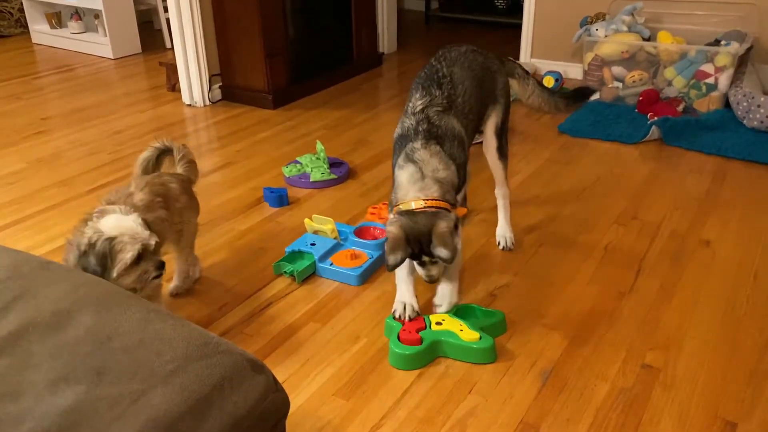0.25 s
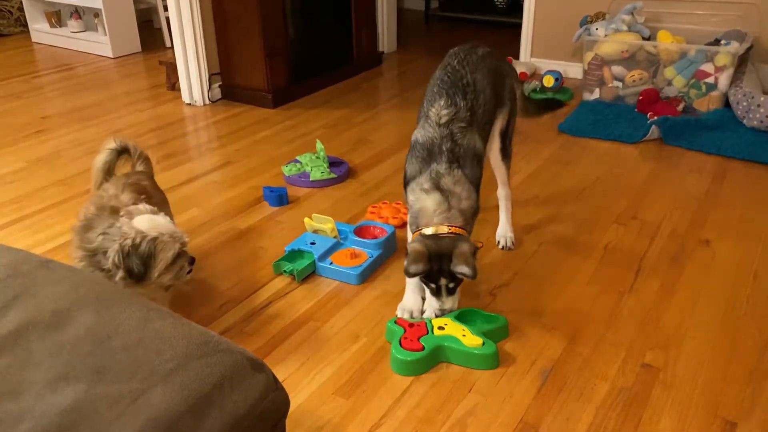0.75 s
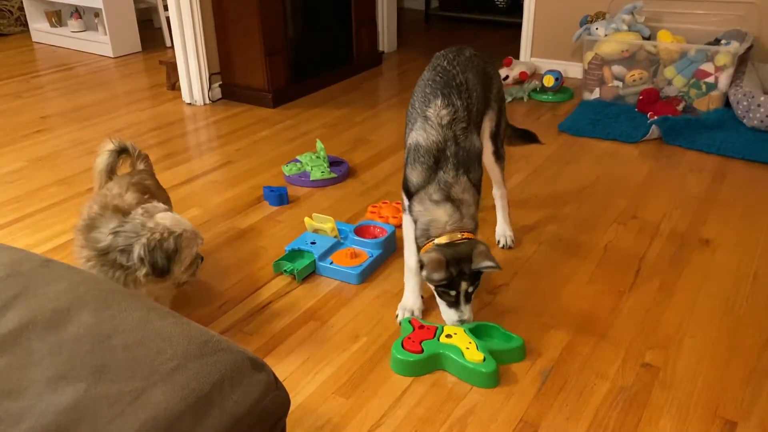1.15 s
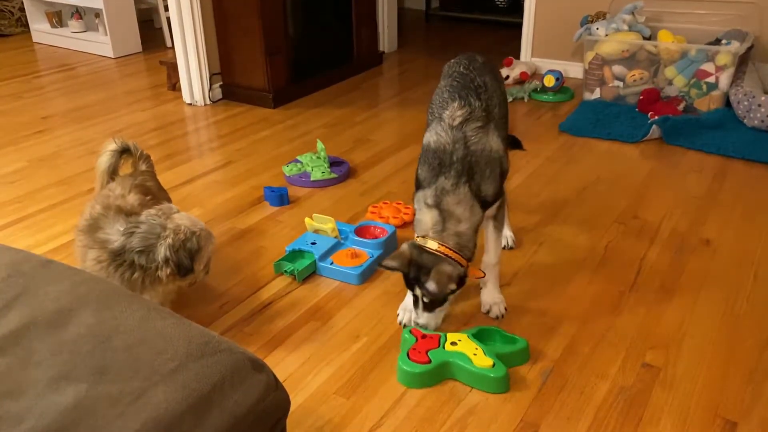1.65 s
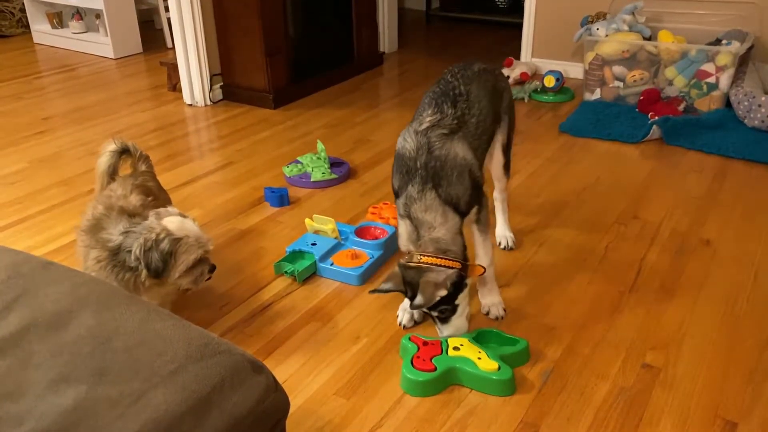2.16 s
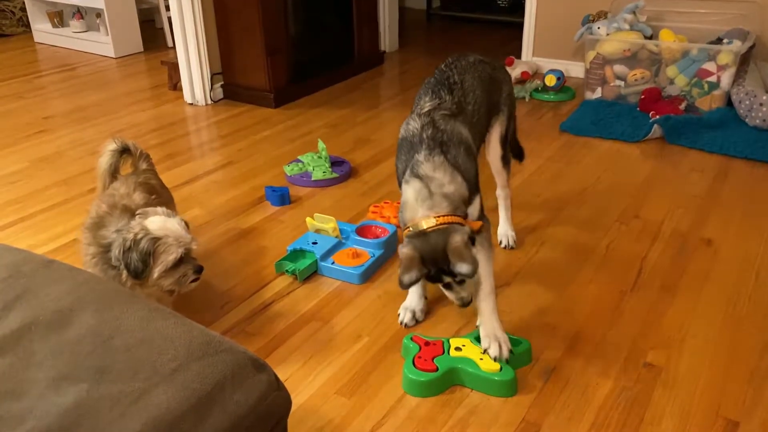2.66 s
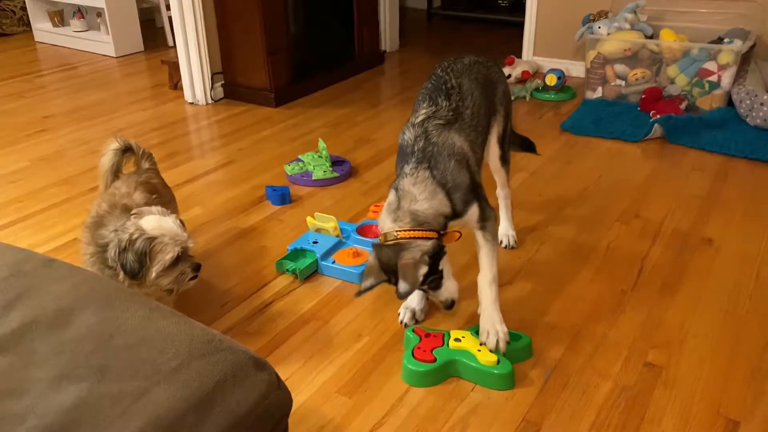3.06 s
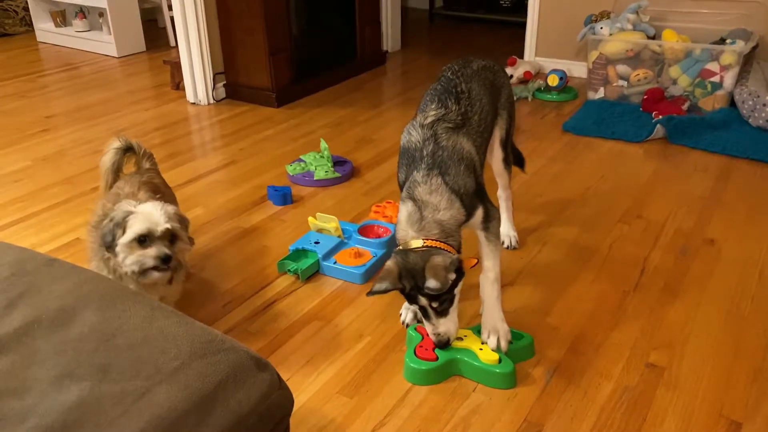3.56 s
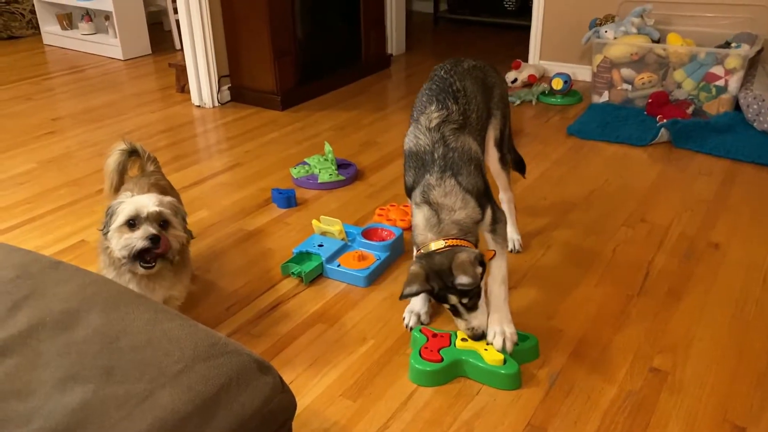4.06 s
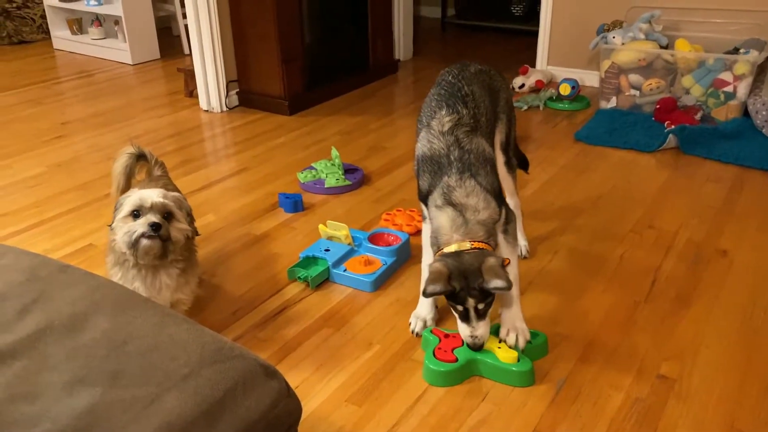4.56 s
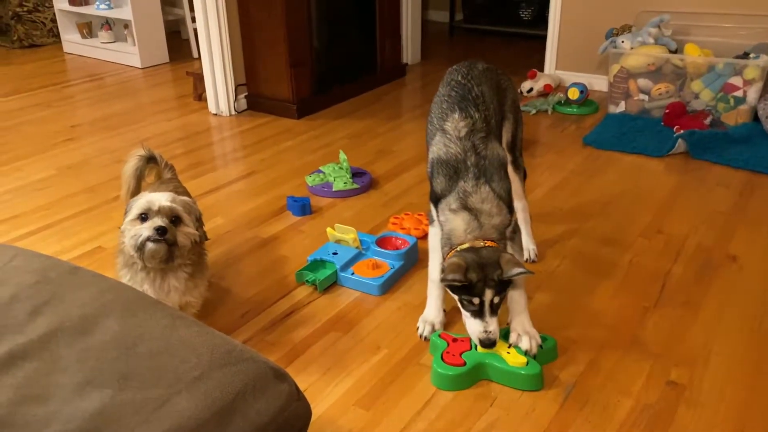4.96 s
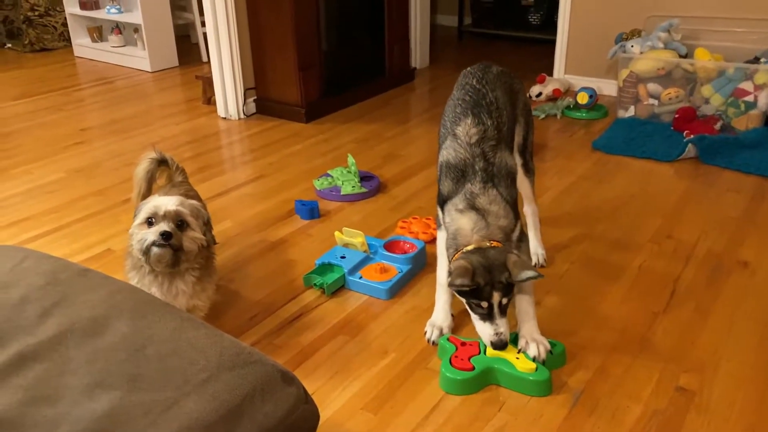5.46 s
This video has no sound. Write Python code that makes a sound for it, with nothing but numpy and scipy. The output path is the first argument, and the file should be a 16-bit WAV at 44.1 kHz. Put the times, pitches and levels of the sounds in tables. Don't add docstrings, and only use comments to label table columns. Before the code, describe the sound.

Hard, hollow plastic knocks tumble out at once, with lids buzzing loosely and floorboards thumping underneath. The toy settles and a dog snuffles softly at it, bumping it gently. Two crisp paw slaps land around 2.5 and 2.8 seconds; later come quiet scrapes, sniffs and weaker taps near 4.7 and 5.3 seconds. Low house hush, lively small room, distant handheld stereo pickup.

```python
import sys
import numpy as np
from scipy import signal
from scipy.fft import rfft, irfft, next_fast_len
from scipy.io import wavfile

SR = 44100
rng = np.random.default_rng(int(sys.argv[2]) if len(sys.argv) > 2 else 0)


def wav_out(sig):
    wavfile.write(sys.argv[1], SR, np.round(np.clip(np.atleast_2d(sig).T, -1, 1) * 32767).astype(np.int16))


def gain_from_db(level_db):
    decades = np.asarray(level_db, float) / 20
    return 10 ** decades


N = 251811


def evened(x):
    return x / np.sqrt(np.mean(x ** 2) + 1e-20)


def peaked(x):
    return x / np.abs(x).max()


def read(points, hz):
    f, value = np.transpose(points)
    return np.interp(np.log(hz + 1), np.log(f + 1), value)


def add(mix, s, sound):
    part = mix[round(s * SR):][:len(sound)]
    part += sound[:len(part)]


def span(s, length):
    return slice(round(s * SR), round((s + length) * SR))


def colour(x, points):
    n = next_fast_len(x.shape[-1])
    gain = gain_from_db(read(points, np.fft.rfftfreq(n, 1 / SR)))
    return irfft(rfft(x, n) * gain, n)[..., :x.shape[-1]]


def resonate(x, hz, width_hz):
    turn = np.exp(2j * np.pi * np.cumsum(hz * np.ones(len(x))) / SR)
    r = np.exp(-np.pi * width_hz / SR)
    for _ in range(2):
        x = 2 * (turn * signal.lfilter([1 - r], [1, -r], x / turn)).real
    return x


def ring(t, hz, db, t60, phase=0):
    return gain_from_db(db - 60 * t / t60) * np.sin(2 * np.pi * (hz * t + phase))


EARLY, POINTED = 0.52, 6.3


def arch(t, start, length):
    along = np.clip((t - start) / length, 0, 1)
    return np.maximum(np.sin(np.pi * along ** EARLY), 0) ** POINTED


def stick_slip():
    return gain_from_db(2 * rng.exponential(1, N)) * (rng.random(N) < 600 / SR)


# start in seconds, length in seconds, rumble in dB.
WEIGHT_SHIFTS = [
    (-0.05, 0.38, -38),
    (0.145, 0.78, -51),
    (0.65, 1, -63),
    (1.516, 0.8, -57.5),
    (2.44, 0.6, -53),
    (2.943, 0.85, -61),
    (4.102, 0.98, -73.5),
    (4.69, 0.85, -57.5),
]
# frequency in Hz, level in dB per Hz.
BOARD_NOISE = [(15, -29), (50, 10.5), (90, 4.5), (230, -7), (310, -11.5), (500, -42)]
# frequency in Hz, level in dB per Hz.
HUSH = [(12, -45), (30, -9), (83, -6), (300, -23), (558, -17.5), (949, -26.5), (1660, -32.5), (7110, -40.5),
        (11100, -45.5), (13000, -54.5), (14000, -81), (16000, -90)]
HUSH_DB, STILL_DB = -68, -68


def hush():
    t = np.arange(N) / SR
    weight = gain_from_db(STILL_DB) + sum(gain_from_db(db) * arch(t, s, length) for s, length, db in WEIGHT_SHIFTS)
    rumble = weight * evened(colour(rng.standard_normal((2, N)), BOARD_NOISE))
    return rumble + gain_from_db(HUSH_DB) * evened(colour(rng.standard_normal((2, N)), HUSH))


# frequency in Hz, level in dB per Hz.
CRACK_BODY = [(1500, -27.5), (3000, -5.5), (4800, -7.5), (7300, -11.5), (11000, -13.5), (16000, -29.5)]


def crack(tick_db, tip_db, noise):
    t = np.arange(len(noise)) / SR
    fall = gain_from_db(-60 * t / 0.01) + gain_from_db(-11 - 60 * t / .035)
    shape = np.roll((1 - np.exp(-t / 0.0002)) * fall, 64)
    burst = noise * shape
    for _ in range(4):
        z = rfft(burst)
        burst = irfft(z / (abs(z) + 1e-12)) * shape
    body = colour(burst, CRACK_BODY)
    tip = colour(burst, [(6000, -46), (9500, 1.0), (16000, 4.5)])
    return gain_from_db(tick_db) * peaked(body) + gain_from_db(tip_db) * peaked(tip)


# start in seconds, cavity level in dB,
# shell in dB over cavity, crack in dB over cavity, cavity pitch in Hz.
SHOVES = [(0.0, -18.5, 9.5, 7.5, 788), (0.009, -23.5, 6.5, -19.5, 1126), (0.063, -24, 5.5, -14, 910),
          (0.073, -18.5, -9.5, 6.5, 724), (0.086, -19.5, -12.5, 1, 1056), (0.106, -24.5, -6, -7, 825),
          (0.155, -23.5, 2, -8.5, 976), (0.166, -21, 0.5, -9, 855), (0.3, -29.5, 9.5, 11, 1003),
          (0.307, -23.5, 9, 7, 859), (0.39, -27, 5, -11, 845), (0.458, -21, 1, -8.5, 998),
          (0.465, -23.5, 4.5, 8.5, 1072), (0.478, -17, 2.5, -1.5, 960), (0.513, -19.5, -27, -9, 917),
          (0.583, -20, 1.5, -15.5, 997), (0.12, -25.5, -4.5, -11.5, 820), (0.503, -25, -5.5, -10.5, 850),
          (0.526, -25.5, -5, -11, 900), (0.541, -26.5, -3, -9, 810), (0.604, -28, -4, -13, 900)]
# start in seconds, cavity level in dB, shell in dB over cavity,
# crack in dB over cavity, cavity pitch in Hz.
SLAPS = [(2.482, -26, -11, 4, 823), (2.49, -35, -17, -26, 620), (2.505, -31, -4, -26, 747),
         (2.76, -37.5, -7, 3.5, 864), (2.767, -31.5, 4.5, -1, 810), (3.096, -55, 7, 6.5, 1201),
         (3.184, -56.5, 4, -1, 873), (4.486, -43, -6, -1, 944), (4.671, -51, 1, -6, 970),
         (4.695, -33.5, -15, -7.5, 764), (4.719, -32, -1, -12, 716), (5.303, -44, -9.5, -15, 910),
         (5.311, -45, -28, -28, 645)]
# start in seconds, cavity level in dB,
# shell in dB over cavity, cavity pitch in Hz.
NUDGES = [(1.094, -52.5, -18, 1150), (1.127, -54, 0.5, 989), (1.66, -43, -0.5, 900),
          (1.67, -41.5, -27.5, 861), (1.681, -42.5, -23, 894), (1.692, -41, -26, 788),
          (1.699, -43.5, -26, 833), (1.716, -53.5, -24.5, 744), (1.756, -44, -2.5, 837),
          (1.771, -46, -30, 802), (2.262, -51.5, -9, 797), (2.272, -55, -8, 908), (2.693, -41.5, -10, 840),
          (2.715, -44.5, -7.5, 904), (2.741, -66, -15, 930), (2.935, -45.5, -11, 1035),
          (2.968, -41.5, -2.5, 890), (3.003, -44.5, -2.5, 887), (3.914, -62, -27, 880),
          (3.998, -55, -9.5, 753), (4.01, -59.5, -11, 912), (4.195, -44, -20, 1086),
          (4.206, -52, -12, 1280), (4.215, -44.5, -14, 792), (4.293, -47.5, -5, 958),
          (4.333, -58, -22.5, 1195), (4.733, -63, -17, 626), (5.009, -53.5, -14, 1075),
          (5.031, -60.5, -17, 889), (5.269, -60.5, -18, 698), (5.415, -44.5, -22, 821),
          (5.464, -52.5, -17, 1030), (5.478, -47.5, -9, 850)]
# start in seconds, crack level in dB, thin tip in dB.
CLAWS = [(0.073, -33, -26), (0.385, -28, -32), (0.446, -25, -28.5), (0.453, -21.5, -28),
         (1.095, -70, -62.5), (1.699, -69.5, -62), (1.714, -65, -82), (2.309, -75, -79), (2.571, -33, -63),
         (3.623, -90.5, -86), (3.769, -67, -77), (3.784, -55, -56), (3.959, -90, -49.5), (3.998, -71, -76),
         (4.244, -76, -52), (4.294, -65, -52.5), (4.332, -84, -48), (4.63, -65, -76), (5.268, -70.5, -85.5),
         (4.943, -59, -81), (5.614, -92.5, -62), (0.459, -32, -33), (5.304, -82, -75.5)]
# share of the pitch, level in dB, t60 in seconds.
CAVITY = [(0.778, -2, 0.024), (0.902, 0.5, 0.028), (1, -4, 0.05), (1.122, -7.5, 0.032),
          (1.299, -8.5, 0.027), (1.5, -7, 0.027)]
# frequency in Hz, level in dB, t60 in seconds.
SHELL = [(1430, 4, 0.0055), (1900, -10.5, 0.0074), (2070, 6.5, 0.0044), (2238, -7, 0.0014),
         (2364, -6, 0.028), (2675, -6.5, 0.012), (3030, -6, 0.011), (3818, -4, 0.0078)]
NOSE_CRACK_DB, TIP_DB = -38, -13
HOLLOW_DB = 1
LOAD_S, FILL_S = 0.000095, 0.001


def knocks():
    out, t = np.zeros(N), np.arange(2048) / SR
    fill, load = 1 - np.exp(-(t / FILL_S) ** 2), 1 - np.exp(-t / LOAD_S)
    nudges = [(s, db, shell_db, NOSE_CRACK_DB, hz) for s, db, shell_db, hz in NUDGES]
    blows = SHOVES + SLAPS + nudges
    spots = rng.standard_normal((len(blows), 3, len(SHELL)))
    for (s, db, shell_db, _, hz), (detune, shade, phase) in zip(blows, spots):
        cavity = sum(ring(t, hz * share, d, t60, p) for (share, d, t60), p in zip(CAVITY, phase))
        shell = sum(ring(t, f * (1 + 0.054 * a), d + 2 * b, t60, p)
                    for (f, d, t60), a, b, p in zip(SHELL, detune, shade, phase))
        body = gain_from_db(HOLLOW_DB) * peaked(cavity * fill) + gain_from_db(shell_db) * peaked(shell * load)
        add(out, s, gain_from_db(db) * body)
    cracks = CLAWS + [(s, db + tick_db, db + tick_db + TIP_DB) for s, db, _, tick_db, _ in blows]
    for (s, tick_db, tip_db), noise in zip(cracks, rng.standard_normal((len(cracks), len(t)))):
        add(out, max(s - 64 / SR, 0), crack(tick_db, tip_db, noise))
    return out


# start in seconds, level in dB, t60 in seconds.
RATTLES = [(0.0, -37.5, 0.38), (0.064, -31, 0.57), (0.299, -34.5, 0.64), (0.386, -66, 0.13),
           (0.466, -31.5, 0.52), (0.577, -38, 0.092), (2.484, -32, 0.07), (2.532, -53.5, 0.83),
           (2.763, -32.5, 0.024), (2.79, -65, 0.85), (4.693, -59.5, 0.95), (5.304, -60, 0.095)]
BRUSH_DB, BRUSH_S = -13.5, 0.04


def rattle():
    t, level = np.arange(N) / SR, np.zeros(N)
    for s, db, t60 in RATTLES:
        level += (t >= s) * gain_from_db(db - 2.5 - 60 * np.maximum(t - s, 0) / max(t60, .02))
        level += (t < s) * gain_from_db(db + BRUSH_DB - 60 * abs(t - s) / BRUSH_S)
    size = gain_from_db(3 * np.minimum(rng.exponential(1, N), 3))
    clicks = size * (rng.random(N) < 1800 / SR)
    mode, u = rng.integers(0, 12, N), np.arange(256) / SR
    chatter = np.zeros(N)
    for k, hz in enumerate(np.geomspace(1200, 6500, num=12)):
        chatter += signal.oaconvolve(clicks * (mode == k), ring(u, hz, 0, 14 / hz))[:N]
    return level * evened(chatter)


# start in seconds, level in dB, panel pitch in Hz, t60 in seconds.
RAPS = [(0.001, -13.5, 3320, 0.018), (0.008, -20.5, 4654, 0.024), (0.011, -23, 2357, 0.02),
        (0.02, -21.5, 2923, 0.024), (0.064, -13.5, 2000, 0.022), (0.072, -26.5, 1932, 0.023),
        (0.075, -19.5, 4535, 0.0089), (0.085, -31.5, 7240, 0.0066), (0.097, -20.5, 4340, 0.0068),
        (0.153, -26, 1840, 0.014), (0.169, -21, 1885, 0.023), (0.3, -19.5, 2409, 0.03),
        (0.307, -20, 3424, 0.012), (0.311, -23.5, 1648, .015), (0.385, -33, 6670, 0.005),
        (0.39, -22.5, 1932, 0.017), (0.444, -38, 2080, .008), (0.479, -15, 1900, 0.022),
        (0.49, -25.5, 1896, 0.026), (0.498, -30.5, 2500, .01), (0.529, -33, 1511, 0.018),
        (0.542, -29, 1586, 0.01), (0.585, -31.5, 3597, .008), (0.604, -34, 1527, .012),
        (1.66, -42, 1515, 0.023), (1.712, -51, 5540, .015), (1.758, -52, 3730, 0.015),
        (2.481, -27, 2780, 0.0098), (2.49, -35.5, 3290, 0.02), (2.504, -51, 3060, 0.0067),
        (2.529, -49, 2400, .012), (2.573, -46, 4470, 0.0069), (2.763, -38, 1770, 0.012),
        (2.767, -32.5, 2650, 0.022), (2.772, -56, 3650, 0.0089), (4.293, -55, 1546, 0.03),
        (4.303, -52, 1225, 0.03), (4.484, -44, 4740, 0.011), (4.695, -40.5, 3780, 0.013),
        (4.72, -35.5, 1380, 0.022), (4.738, -49, 2220, 0.016), (5.01, -72, 1292, 0.02),
        (5.304, -45, 2230, 0.015), (5.306, -54, 3800, 0.0069), (2.262, -60, 1500, 0.021),
        (3.184, -53, 1760, 0.011), (2.763, -38, 4460, .006), (2.77, -51, 3200, 0.011),
        (2.776, -44, 3600, 0.018), (4.671, -54, 3700, 0.0087), (4.719, -49, 3640, 0.0065),
        (1.097, -63, 1220, 0.064), (5.316, -46.5, 1736, 0.0094), (5.443, -64, 2577, 0.025),
        (5.463, -51.5, 1520, 0.037), (4.695, -36, 2150, 0.0093), (4.72, -44, 2720, 0.012),
        (2.761, -33.5, 7200, .006), (5.318, -56, 3780, .02), (5.305, -52, 4900, .006)]
# share of the pitch, level in dB.
PANEL = [(.93, -4.5), (1.002, 8), (1.08, -12.5)]


def raps():
    out, t = np.zeros(N), np.arange(2048) / SR
    for s, db, hz, t60 in RAPS:
        panel = sum(ring(t, hz * share, d, max(t60, .003)) for share, d in PANEL)
        add(out, s, gain_from_db(db) * peaked(panel * (1 - np.exp(-t / LOAD_S))))
    return out


# start in seconds, level in dB, pitch in Hz, t60 in seconds.
THUMPS = [(0.104, -36.5, 162.5, 0.23), (0.422, -27.5, 88.4, 0.095), (0.424, -34, 181, 0.05),
          (0.491, -35, 163, 0.26), (0.728, -48.5, 116.1, 0.039), (0.741, -35, 86.4, 0.22),
          (0.743, -46, 169, 0.08), (1.398, -44, 100, 0.14), (1.44, -49.5, 58.2, 0.35),
          (1.638, -57, 62.3, 0.34), (1.756, -46, 202, 0.12), (2.083, -65.5, 74, 0.15),
          (2.262, -55.5, 100.5, 0.46), (2.483, -35, 197, 0.028), (2.504, -30.5, 230.4, 0.016),
          (2.523, -43, 205, 0.06), (2.769, -41.5, 156.5, 0.04), (2.782, -39, 201, 0.016),
          (2.502, -37, 153.4, 0.13), (0.442, -35.5, 202, 0.072), (0.002, -38, 327, 0.046),
          (0.113, -35, 339, 0.17), (0.304, -39.5, 338, 0.18), (0.505, -38, 332.4, 0.21),
          (0.743, -53.5, 355, 0.071), (5.306, -61.5, 327.4, .1), (2.988, -51, 205, 0.089),
          (3.221, -57.5, 62.3, 0.075), (3.998, -64.5, 64.5, 0.18), (4.202, -57, 194, 0.058),
          (4.463, -53.5, 128.2, 0.54), (4.726, -44.5, 185, 0.051), (5.301, -49, 166.8, 0.097),
          (5.459, -52.5, 69.4, 0.077)]
# share of the pitch, level in dB.
BOARDS = [(0.6, -3), (0.999, 4), (1.348, -1), (1.901, -11.5), (2.699, -15)]
SAG, SAG_S, STIFF = 0.078, .03, .7


def thumps():
    out, t = np.zeros(N), np.arange(SR // 2) / SR
    sag = t + SAG * SAG_S * (1 - np.exp(-t / SAG_S))
    rise = 1 - np.exp(-(t / .005) ** 2)
    for s, db, hz, t60 in THUMPS:
        boards = sum(ring(sag, hz * share, d, max(t60 / share ** STIFF, .01)) for share, d in BOARDS)
        add(out, s, -gain_from_db(db) * peaked(boards * rise))
    return out


# start in seconds,
# length in seconds, level in dB, pitch in Hz.
HUMS = [(0.75, 0.26, -65.5, 1220), (1.081, 0.11, -69, 1285), (1.132, 0.2, -75, 1190),
        (1.062, 0.096, -71.5, 933), (1.075, 0.16, -77, 2484), (4.185, 0.086, -69, 850),
        (0.02, 0.27, -49.5, 290), (0.9, 0.59, -82, 300), (3.016, 0.41, -78, 274),
        (3.95, 0.26, -77.5, 278.1), (5.38, 0.21, -68.5, 237), (4.76, 0.31, -78, 5600),
        (4.777, 0.23, -63.5, 670), (5.005, 0.073, -79, 1150), (5.307, 0.091, -74, 2110),
        (5.31, 0.091, -73, 1250), (5.414, 0.2, -68, 791)]


def hums():
    t, out, rub = np.arange(N) / SR, np.zeros(N), stick_slip()
    for s, length, db, hz in HUMS:
        part = span(s, length)
        hum = evened(resonate(rub[part], hz, 110))
        add(out, s, gain_from_db(db) * arch(t[part], s, length) ** .5 * hum)
    return out


# start in seconds, length in seconds, level in dB,
# cavity pitch in Hz.
SLIPS = [(0.697, 0.42, -55, 893), (0.895, 0.33, -67, 1220), (1.093, 0.32, -79.5, 1226),
         (1.303, 0.09, -58.5, 837), (1.464, 0.098, -77, 756), (1.736, 0.43, -62.5, 750),
         (2.259, 0.12, -73, 777), (2.91, 0.32, -73, 830), (4.097, 0.38, -62.5, 900),
         (4.444, 0.18, -61, 832), (4.684, 0.083, -48.5, 730), (4.841, 0.46, -55, 624),
         (5.411, 0.1, -49, 798)]


def slips():
    t, out, clicks = np.arange(N) / SR, np.zeros(N), stick_slip()
    for s, length, db, hz in SLIPS:
        part = span(s, length)
        scrape = evened(resonate(clicks[part], hz, 400))
        add(out, s, gain_from_db(db - 9) * arch(t[part], s, length) * scrape)
    return out


# start in seconds, length in seconds, air level in dB,
# thin hiss in dB over air, nostril resonance in Hz.
SNIFFS = [(0.805, 0.255, -72.5, -7.5, 4710), (1.007, 0.116, -80.5, -3.5, 5500),
          (1.039, 0.39, -70, -6, 5080), (1.373, 0.071, -75.5, -27, 2600), (1.619, 0.36, -64, -13, 5760),
          (2.045, 0.18, -73.5, -24.5, 2510), (2.253, 0.27, -68.5, -15.5, 5040),
          (2.873, 0.47, -69, -13.5, 4640), (3.12, 0.1605, -71, -33.5, 4500), (3.326, 0.13, -73, -21, 4840),
          (3.754, 0.1, -83, -14, 5020), (3.885, 0.09, -83.5, -5, 5530), (4.092, 0.23, -71, -13.5, 4430),
          (4.22, 0.067, -68.5, -11, 7230), (4.274, 0.19, -77, -7, 5360), (4.414, 0.24, -65.5, -13, 4950),
          (4.627, 0.26, -61.5, -18, 4330), (4.723, 0.31, -65, -17, 5500), (4.825, 0.31, -67.5, -29, 5600),
          (1.249, 0.15, -79.5, -12, 2700), (2.483, 0.4, -60, -16, 4540), (2.763, 0.22, -66, -15, 5000),
          (5.301, 0.023, -62.5, -36.5, 4810), (5.406, 0.29, -90, -21, 4950)]
# frequency in Hz, level in dB per Hz.
AIR = [(700, -4), (1200, -9.5), (3000, -12.5), (5800, -21), (7500, -16), (10000, -78), (16500, -65)]
FLARE = 0.36
NOSTRIL_DB, NOSTRIL_WIDTH_HZ = -6.5, 1060


def snuffle():
    t, out = np.arange(N) / SR, np.zeros(N)
    air, jet = evened(colour(rng.standard_normal(N), AIR)), rng.standard_normal(N)
    thin = [(6500, -7.5), (9000, 2.0), (12500, -5.5), (13500, -20), (15500, -9)]  # (Hz, dB)
    hiss = evened(colour(rng.standard_normal(N), thin))
    for s, length, air_db, hiss_db, hz in SNIFFS:
        part = span(s, length)
        flow = arch(t[part], s, length)
        bend = hz * (1 - FLARE + FLARE * flow)
        nostril = gain_from_db(NOSTRIL_DB) * flow * evened(resonate(jet[part], bend, NOSTRIL_WIDTH_HZ))
        breath = air[part] + nostril + gain_from_db(hiss_db + 7.0) * hiss[part]
        add(out, s, gain_from_db(air_db) * flow * breath)
    return out


# frequency in Hz, t60 in seconds.
ROOM_T60 = [(100, 0.69), (300, 0.2), (800, 0.43), (2000, 0.33), (5000, 0.2), (11000, 0.29), (15000, 0.2)]
# frequency in Hz, tail over direct sound in dB.
ROOM_DB = [(100, 3), (800, 7.5), (3000, 4.5), (10000, 2.5)]
BUILD_S = 0.0018


def room(x):
    taps = np.zeros((6, SR * 3 // 4))
    length = taps.shape[1]
    at = np.arange(120, length - 20, 20) + rng.integers(0, 20, (6, (length - 121) // 20))
    np.put_along_axis(taps, at, rng.choice([-1., 1.], at.shape), 1)
    taps *= 1 - np.exp(-np.arange(length) / SR / BUILD_S)
    hz, t, z = signal.stft(taps, SR, nperseg=256)
    t60 = read(ROOM_T60, hz)[:, None]
    decay = gain_from_db(read(ROOM_DB, hz)[:, None] - 60 * t / t60) / np.sqrt(t60)
    tail = signal.istft(z * decay, SR, nperseg=256)[1]
    tail /= np.sqrt(SR / 20 / (6 * np.log(10)))
    turn = 2 * np.pi * (np.arange(N) / SR * 23 + np.arange(3)[:, None] / 3)
    parts = np.repeat(x * np.sqrt((1 + np.cos(turn)) / 3), 2, axis=0)
    return signal.fftconvolve(parts, tail, axes=1)[:, :N].reshape(3, 2, N).sum(0)


# frequency in Hz, left-right likeness from 0 to 1.
SAME = [(50, .93), (300, 0.59), (700, 0.069), (1500, 0.19), (2500, 0.71), (5500, 0.068), (6800, 0.81),
        (16000, .94)]


def diffuse(pair):
    n = next_fast_len(N + 8192)
    same = np.clip(read(SAME, np.fft.rfftfreq(n, 1 / SR)), 0, 1)
    a, b = rfft(pair, n)
    return irfft(np.array([a, same * a + np.sqrt(1 - same ** 2) * b]), n)[:, :N]


RAP_ROOM_DB = -3


def scene():
    wide = knocks() + rattle() + thumps() + hums() + slips() + snuffle()
    beamed = raps()
    near = wide + beamed
    scatter = rng.standard_normal((2, 384)) * gain_from_db(-60 * np.arange(384) / SR / .010)
    scatter[:, 0] = [13, 9]
    scatter /= np.linalg.norm(scatter, axis=1)[:, None]
    paths = colour(scatter, [(300, -29.5), (900, -1.0)])
    direct = signal.oaconvolve(near[None], paths, axes=1)[:, :N]
    lows = colour(np.pad(near, (0, 8192)), [(300, -4.0), (900, -34.5)])[:N]
    answer = room(wide + gain_from_db(RAP_ROOM_DB) * beamed)
    return diffuse(gain_from_db(3.5) * (direct + lows) + answer + hush())


def top_cut(x):
    return signal.sosfilt(signal.butter(12, 17110, fs=SR, output="sos"), x)


# frequency in Hz, level in dB.
MIC = [(15, -27.5), (40, -3.5), (70, -4), (330, 1), (500, -6.5), (750, -3.5), (1100, -3), (16000, -7)]
# frequency in Hz, left minus right in dB.
BALANCE_DB = [(60, 0.43), (180, 0.5), (550, 2.5), (1650, 1), (4970, 4), (15000, -2)]
TREBLE_HZ, COMB_HZ = 7050, 4170
EDGE_HZ = 15850


def record(dry):
    n = next_fast_len(N + 8192)
    hz = np.fft.rfftfreq(n, 1 / SR)
    lead = 2 * np.pi * np.maximum(hz - TREBLE_HZ, 0) / COMB_HZ
    edge_db = -36 * np.clip((hz - EDGE_HZ) / 150, 0, 1)
    left, right = rfft(dry, n) * gain_from_db(read(MIC, hz) + edge_db)
    tilt_db = read(BALANCE_DB, hz) / 2
    sides = np.array([left * gain_from_db(tilt_db), right * gain_from_db(-tilt_db) * np.exp(1j * lead)])
    return top_cut(irfft(sides, n)[:, :N])


dry = scene()
out = record(dry)
wav_out(out)
```